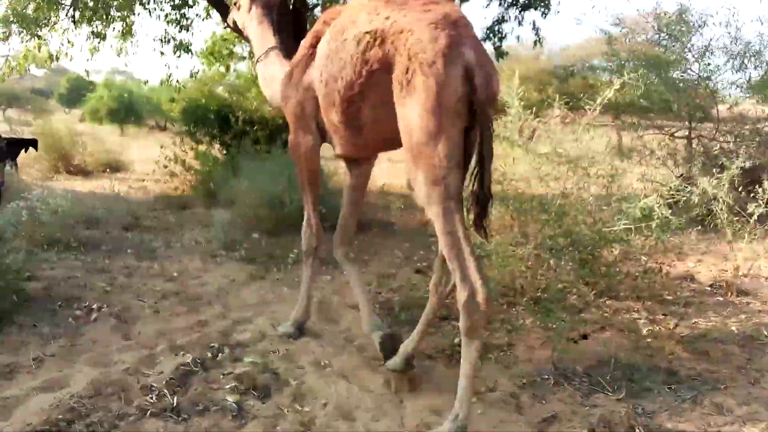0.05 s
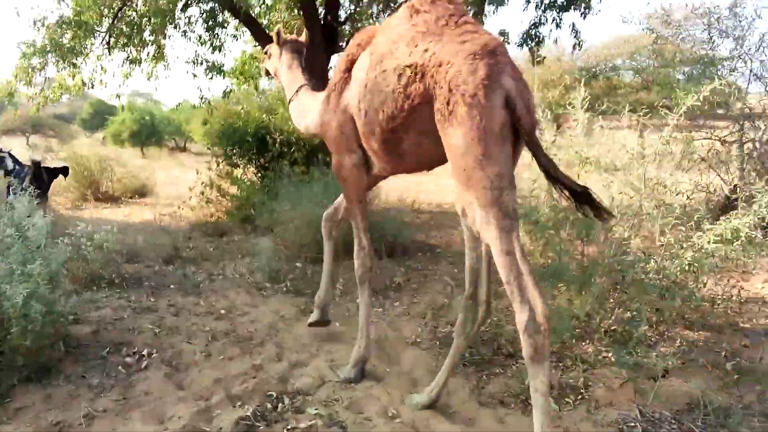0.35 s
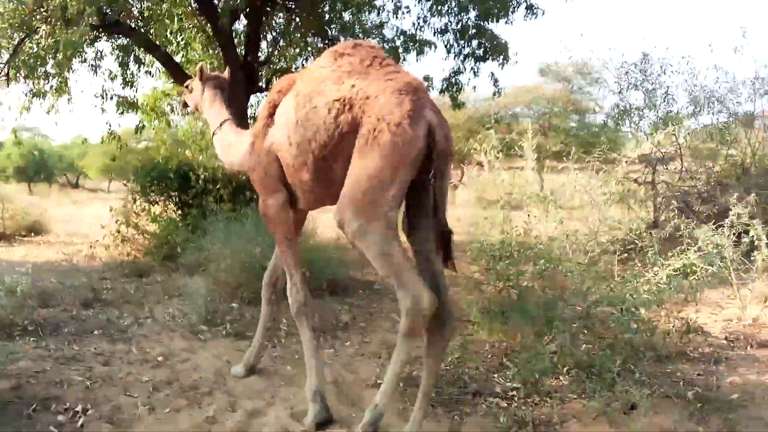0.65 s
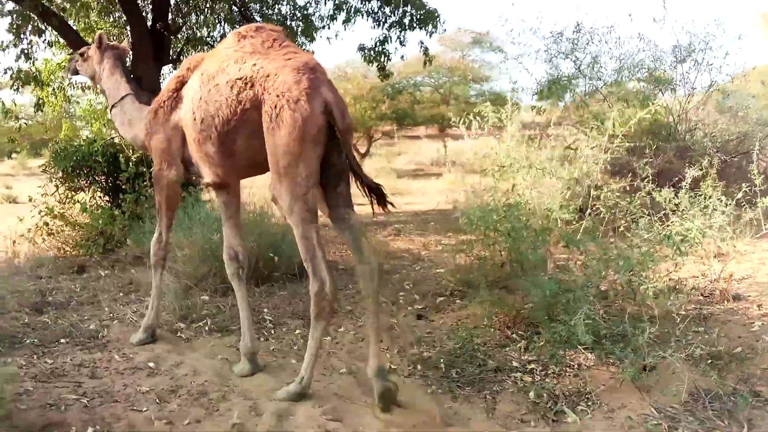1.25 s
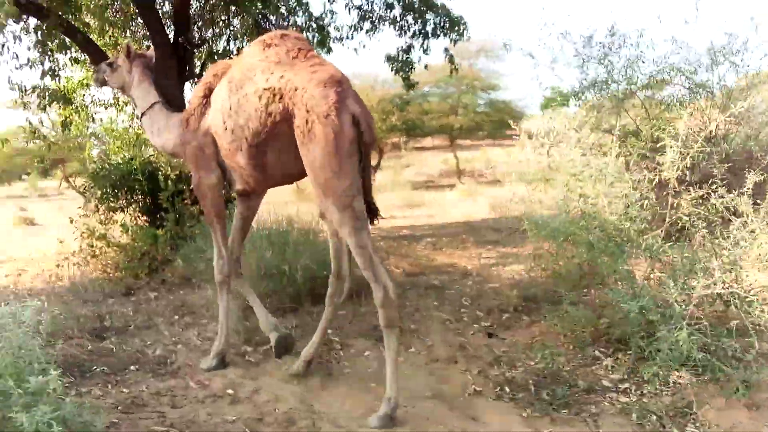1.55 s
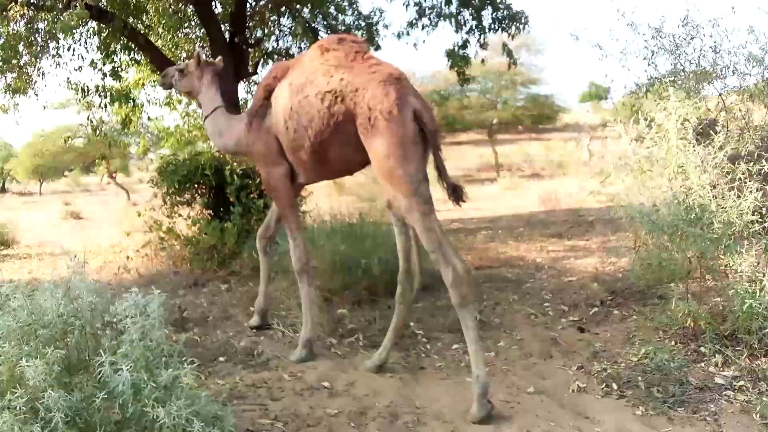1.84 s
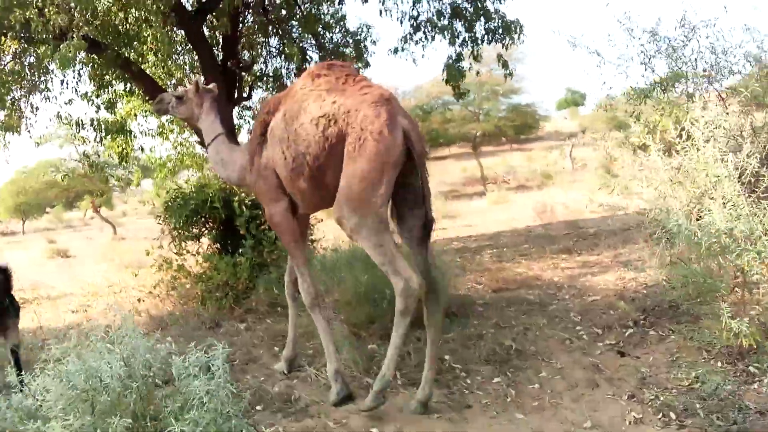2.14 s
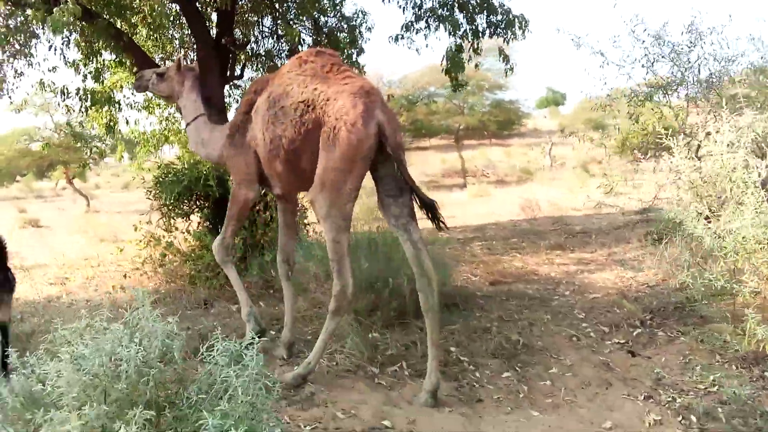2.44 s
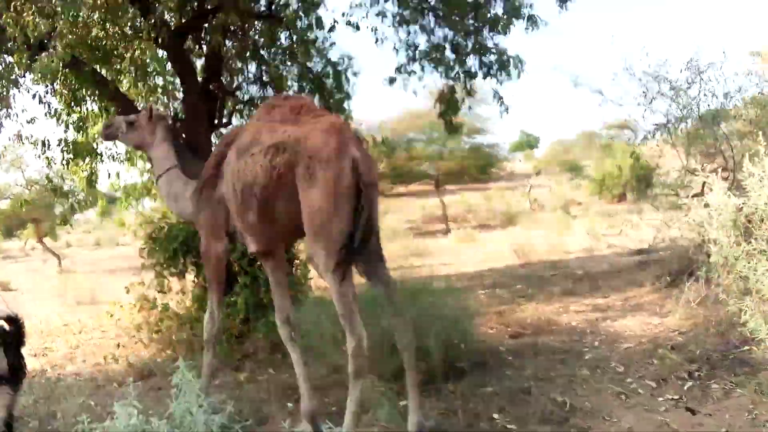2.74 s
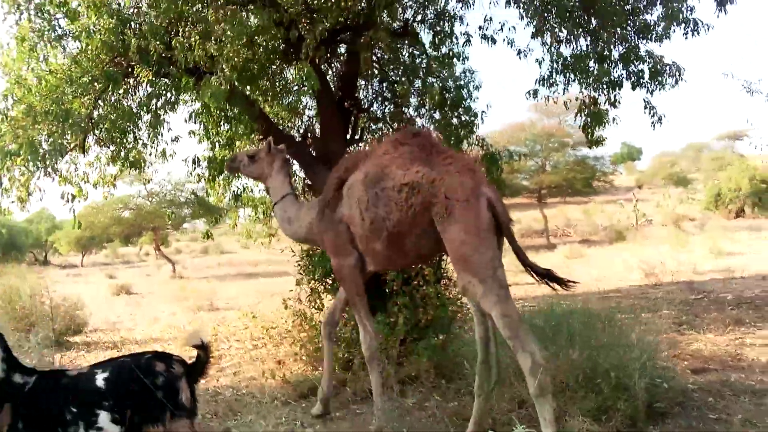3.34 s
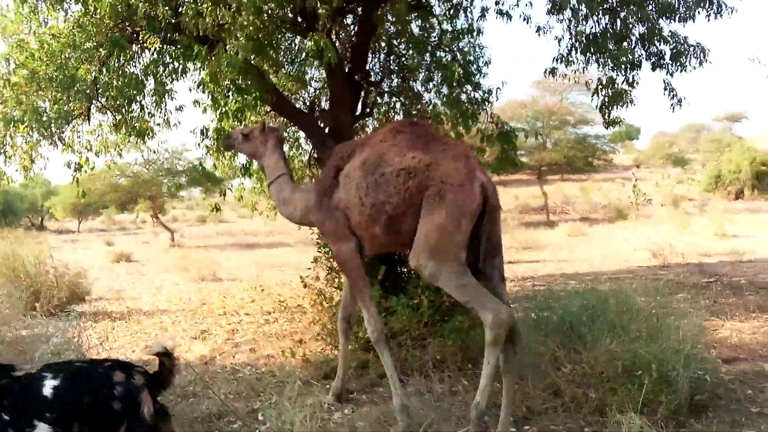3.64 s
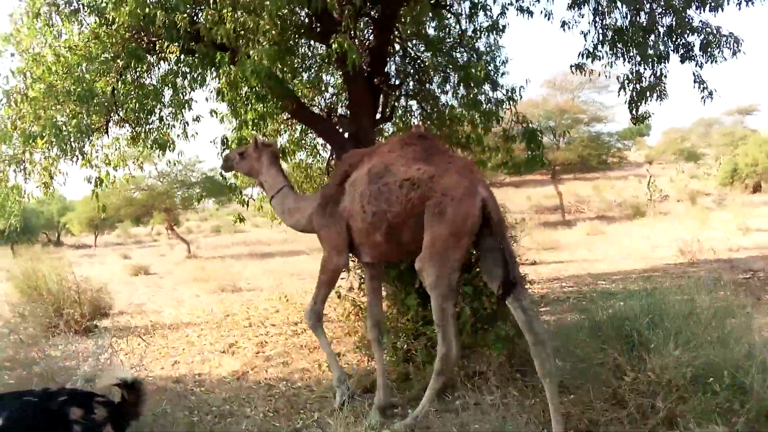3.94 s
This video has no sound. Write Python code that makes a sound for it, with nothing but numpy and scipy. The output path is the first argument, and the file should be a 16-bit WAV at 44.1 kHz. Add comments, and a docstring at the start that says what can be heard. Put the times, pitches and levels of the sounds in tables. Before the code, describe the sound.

A camel's long, rattling groan, with footsteps crunching on dry leaves and sand close by.

```python
"""Camel groaning in dry scrub

A camel gives one long, low groan: slow pulses, even at first, then ragged, ring its throat and mouth.
Close by, steps scuff through sand and dry leaves, with soft thuds, small ticks and one snapping twig.
The carried microphone rumbles under a faint outdoor hiss, and near the end something knocks it sharply."""
import sys
import numpy as np
from scipy import signal
from scipy.fft import rfft, irfft
from scipy.io import wavfile
from scipy.ndimage import uniform_filter1d

SR = 44100
rng = np.random.default_rng(int(sys.argv[2]) if len(sys.argv) > 2 else 0)


def transcribe(signal):
    """Save signal, clipped to [-1, 1], as a 16-bit WAV file at the path in sys.argv[1]."""
    frames = np.atleast_2d(signal).T
    limited = np.clip(frames, -1, 1)
    pcm = np.round(limited * 32767).astype(np.int16)
    wavfile.write(sys.argv[1], SR, pcm)


N = 176400
T = np.arange(N) / SR

# Leaf scuff and fizz through the microphone, which dips at 8 kHz and peaks at 15 kHz: freq_hz, gain_db
SCUFF_COLOUR = [(300, -31), (1100, -9), (1700, 3), (2700, 5.5), (3600, -0.5), (5200, 7), (6600, 4.5),
                (7400, -11.5), (8300, -40), (10000, -18), (13000, -2.5), (16000, -20)]
FIZZ_COLOUR = [(3000, -40), (7500, -24), (9600, -12), (11500, -13), (13300, -13.5), (13900, -9),
               (14400, -2), (15000, 0), (15700, -1), (16300, -12)]


def amp(db):
    """Decibels to gain."""
    return 10 ** (np.asarray(db) / 20)


def unit(x):
    """Scales to rms 1."""
    return x / np.sqrt(np.mean(x ** 2) + 1e-20)


def at_energy(x, db):
    """Scales a short sound to an energy (dB re full scale for one second)."""
    return amp(db) * x / np.sqrt(np.sum(x ** 2) / SR + 1e-20)


def curve(rows, column=1):
    """One column of a table, joined by lines over time."""
    rows = np.array(rows)
    return np.interp(T, rows[:, 0], rows[:, column])


def add(mix, start_s, sound):
    """Mixes a sound in at a time."""
    part = mix[max(round(start_s * SR), 0):][:len(sound)]
    part += sound[:len(part)]


def colour(x, spectrum):
    """Filters by a spectrum, causally so that clicks keep their edge."""
    hz, db = np.transpose(spectrum)
    bins_hz = abs(np.fft.fftfreq(4096, 1 / SR))
    log_gain = np.log(amp(np.interp(np.log(bins_hz + 1), np.log(hz), db)))
    taps = np.fft.ifft(np.exp(np.conj(signal.hilbert(log_gain)))).real
    return signal.fftconvolve(x, taps[:len(taps) // 2])[:len(x)]


def formants(x, modes):
    """Steep resonances of alternating sign, with dark valleys between them."""
    out = np.zeros(len(x))
    for k, (hz, width_hz, db) in enumerate(sorted(modes)):
        b, a = signal.iirpeak(hz, hz / width_hz, SR)
        out += (-1) ** k * amp(db) * signal.lfilter(b, a, signal.lfilter(b, a, x))
    return out


def burst(decay_s):
    """A puff of noise that dies away."""
    t = T[:SR // 10]
    return rng.standard_normal(len(t)) * np.exp(-t / decay_s)


def wander(hz):
    """Smooth random drift of rms 1, up to a rate."""
    lowpass = np.exp(-(np.fft.rfftfreq(N, 1 / SR) / hz) ** 4)
    return unit(irfft(rfft(rng.standard_normal(N)) * lowpass, N))


def scrub_hiss(level_db=-76.5):
    """The faint, thin hiss of open scrub."""
    # Tone of the hiss: freq_hz, gain_db
    tone = [(900, -23), (1700, 0.5), (2400, -3.5), (3400, -14), (4300, -6), (5200, 2.5), (6500, 0.5),
            (7600, -24), (12000, -20)]
    return amp(level_db) * unit(colour(rng.standard_normal(N), tone))


def handling_rumble():
    """Low noise swells and fades as the microphone is carried."""
    # Swells of the rumble: time_s, level_db
    swells = [(0, -68), (.1, -83.5), (.88, -82.5), (.98, -64.5), (1.3, -60.5), (2.5, -65), (3.1, -64),
              (3.25, -61), (3.45, -61), (3.55, -60), (3.64, -65.5), (3.75, -76), (3.81, -88), (4, -77.5)]
    # Tone of the rumble: freq_hz, gain_db
    tone = [(15, -13), (40, -11), (65, 4.5), (130, 9.5), (200, 1.5), (400, -5.5), (700, -13), (2000, -30)]
    return amp(curve(swells)) * unit(colour(rng.standard_normal(N), tone))


def crackle(tone, small_per_s=2500, big_per_s=110, spread_db=4.2, hiss_gain=.55):
    """Thousands of tiny cracks of sand and leaf, a few big ones and a bed of hiss."""
    small = amp(spread_db * np.minimum(rng.exponential(1, N), 4.5)) * rng.choice([-1, 1], N)
    small *= rng.random(N) < small_per_s / SR
    big = 2 * amp(12.5) * rng.uniform(-.73, 1, N)
    big *= rng.random(N) < big_per_s / SR
    return unit(colour(unit(small) + big + hiss_gain * rng.standard_normal(N), tone))


def scuffs(flicker_db=1.5):
    """Three layers of crackle surge under the steps, flickering into clumps."""
    # Envelopes of the scuff, the finest fizz and the low sandy grinding: time_s, level_db
    scuff = [(0, -69.5), (.07, -66.5), (.12, -84.5), (.28, -68.5), (.43, -78.5), (.46, -65), (.56, -59.5),
             (.63, -72.5), (.68, -72), (.71, -66), (.85, -85), (1.11, -84), (1.14, -109), (1.18, -59),
             (1.26, -81.5), (1.44, -66), (1.55, -75), (1.73, -78), (1.8, -56), (1.94, -63), (2.01, -66.5),
             (2.15, -75), (2.33, -69.5), (2.4, -49.5), (2.45, -61), (2.6, -66), (2.64, -58), (2.695, -44.5),
             (2.74, -53), (2.83, -60), (2.87, -51.5), (2.93, -58), (3.05, -62), (3.16, -65.5),
             (3.22, -59.5), (3.38, -69), (3.44, -49.5), (3.5, -54), (3.55, -57.5), (3.59, -66), (3.64, -67),
             (3.77, -65), (3.84, -59.5), (3.915, -47.5), (4.0, -59.5)]
    fizz = [(0, -64.5), (.1, -67.5), (.3, -66), (.43, -70.5), (.47, -52), (.6, -54.5), (.67, -64),
            (.76, -69), (.86, -80.5), (1.1, -79), (1.3, -77), (1.5, -77), (1.72, -85), (1.8, -60.5),
            (1.95, -61), (2.03, -62), (2.15, -67.5), (2.33, -80), (2.39, -48.5), (2.47, -63), (2.58, -62),
            (2.69, -44.5), (2.8, -62.5), (2.87, -57), (3.0, -61.5), (3.15, -68), (3.23, -56), (3.37, -65),
            (3.44, -50), (3.55, -58), (3.64, -67.5), (3.77, -67.5), (3.85, -56), (3.91, -51.5), (4, -59)]
    sand = [(0, -83), (.42, -80), (.55, -55.5), (.66, -67), (.85, -82.5), (3.1, -67), (3.3, -66.5),
            (3.55, -100), (3.65, -85), (3.78, -68), (3.9, -51), (4, -68.5)]
    # Tone of grinding sand: freq_hz, gain_db
    sand_colour = [(100, -53), (350, -18.5), (700, -4), (1100, -8), (1600, 8.5), (2400, 3.5), (3500, -8.5),
                   (6000, -10.5)]
    layers = [(scuff, SCUFF_COLOUR), (fizz, FIZZ_COLOUR), (sand, sand_colour)]
    flicker = amp(flicker_db * wander(hz=60.3))
    return flicker * sum(amp(curve(envelope)) * crackle(tone) for envelope, tone in layers)


def thuds(rise_s=.0063, sag_s=.047):
    """A gritty slap and a low push that sags in pitch and is quickly damped."""
    # Soft thuds: start_s, push_db, pitch_hz, slap_energy_db
    hits = [(.003, -51.5, 102, -70.5), (1.437, -40, 116, -60), (2.017, -43, 83.6, -90),
            (3.304, -57, 71, -76), (3.44, -68, 153.3, -98), (3.463, -47, 130, -76.5), (3.51, -51, 124, -91),
            (3.533, -48, 118, -79), (3.733, -55.5, 98, -111)]
    # Tone of the slap: freq_hz, gain_db
    slap_colour = [(60, -4), (300, 5.5), (750, 3), (1400, -3.5), (3200, -11.5), (5000, -15.5), (12000, -37)]
    out, t = np.zeros(N), T[:SR // 10]
    envelope = t / rise_s * np.exp(1 - t / rise_s)
    for start_s, push_db, pitch_hz, slap_db in hits:
        cycles = pitch_hz * sag_s * (1 - np.exp(-t / sag_s))
        push = amp(push_db) * envelope * np.cos(2 * np.pi * cycles)
        slap = colour(burst(decay_s=.0082), slap_colour)
        add(out, start_s, push + at_energy(slap, slap_db))
    return out


def stalk_clicks(body_db=-14.5):
    """Very short, glassy cracks of brittle stalks."""
    # Stalks clicking close by: start_s, energy_db
    clicks = [(0.16, -80), (0.488, -73), (0.618, -70), (0.6406, -73), (1.913, -72), (2.7513, -61.5),
              (2.754, -67), (2.788, -74.5)]
    out = np.zeros(N)
    for start_s, energy_db in clicks:
        crack = burst(decay_s=.0012)
        top, body = unit(colour(crack, FIZZ_COLOUR)), unit(colour(crack, SCUFF_COLOUR))
        add(out, start_s, at_energy(top + amp(body_db) * body, energy_db))
    return out


def leaf_cracks():
    """Single dry leaves crack, each with its own balance of body and fizzy top."""
    # Leaves ticking, and leaves crushed underfoot: start_s, energy_db, decay_s, top_over_body_db
    ticks = [(0.209, -85, 0.0024, 11), (0.273, -79.5, .004, 36), (0.444, -77.5, 0.0015, 5),
             (.489, -75.5, 0.0013, -1), (0.512, -84, 0.0027, -5), (0.546, -75, 0.0022, -8),
             (.577, -77.5, 0.0029, -2), (0.642, -77, 0.0052, 10), (.657, -76.5, .002, 22),
             (.779, -80.5, 0.0086, 3), (1.326, -79.5, 0.0056, -8), (1.82, -75, .002, 22),
             (1.889, -73.5, 0.0012, -2.5), (2.061, -75, 0.0046, -2), (2.391, -76, .002, 19),
             (2.459, -82, .001, 5), (2.498, -67.5, 0.0027, 5), (2.528, -75, 0.0024, 20),
             (3.233, -87, 0.0007, 5), (3.32, -65.5, 0.026, 13.5), (3.405, -74.5, .004, 8),
             (3.514, -70.5, 0.0022, -4)]
    crunches = [(1.129, -70, 0.019, -36), (2.607, -58, 0.018, -0.5), (2.619, -61.5, .007, -32),
                (3.54, -61, 0.014, -9)]
    out = np.zeros(N)
    for start_s, energy_db, decay_s, top_db in ticks + crunches:
        crack = burst(decay_s)
        top, body = unit(colour(crack, FIZZ_COLOUR)), unit(colour(crack, SCUFF_COLOUR))
        add(out, start_s, at_energy(body + amp(top_db) * top, energy_db))
    return out


def throat_hum(pitch_hz, looseness, centre_hz=241, db_per_octave=56, flutter=.32):
    """The smooth part of the groan: a few low harmonics that flutter as the throat loosens."""
    phase = 2 * np.pi * np.cumsum(pitch_hz) / SR + flutter / 3 * looseness * wander(hz=32)
    hum = np.zeros(N)
    for k in range(2, 7):
        octaves_off = abs(np.log2(k * pitch_hz / centre_hz))
        hum += amp(-db_per_octave * octaves_off) * np.cos(k * phase)
    return unit(hum * (1 + flutter * looseness * wander(hz=32)))


def groan(waver=.014, spread_db=2, puff_s=.014):
    """Slow pulses, ever more ragged and airy, ring the throat and the narrowing mouth over a hum."""
    # Rate of the throat pulses: time_s, pitch_hz
    pitch = [(.85, 78), (.93, 71), (1.0, 73), (1.05, 76), (1.08, 62.5), (1.14, 63), (1.22, 62.4),
             (1.32, 62.4), (1.42, 64.5), (1.55, 60), (1.66, 58.8), (1.88, 60), (2.14, 58), (2.22, 62),
             (2.28, 59.5), (2.41, 62), (2.49, 58), (2.6, 57.5), (2.7, 61), (2.8, 58.7), (3.04, 58.3),
             (3.12, 52)]
    # Raggedness of their timing: time_s, scatter_cycles
    raggedness = [(.85, .005), (1.15, .015), (1.3, .03), (1.55, .06), (2.0, .07), (2.3, .11), (3.1, .11)]
    # Envelope of the deep throat tone: time_s, level_db
    effort = [(.82, -114), (.87, -68.5), (.93, -64), (.98, -60.5), (1.1, -57), (1.25, -50.5), (1.5, -48.5),
              (1.9, -47), (2.13, -44), (2.45, -45), (2.85, -44.5), (3.07, -45.5), (3.11, -52.5),
              (3.15, -82)]
    # How much of the deep tone is smooth hum: time_s, power_share
    smoothness = [(.85, .98), (.93, .85), (.98, .3), (1.1, .03), (1.5, .02), (1.75, .35), (2.1, .75),
                  (2.3, .7), (3.1, .78)]
    # Envelopes of the mouth tone and the bright rasp: time_s, mouth_db, rasp_db
    mouth_levels = [(.9, -96, -91), (.98, -78, -81), (1.06, -90, -87), (1.09, -56, -65), (1.23, -54, -64.5),
                    (1.35, -56, -62), (1.56, -58.5, -59.5), (1.76, -56.5, -62), (2.0, -56.5, -67.5),
                    (2.28, -54.5, -64), (2.55, -57, -65), (2.805, -56, -66), (2.815, -51, -45.5),
                    (2.835, -55, -60.5), (3.06, -63.5, -69.5), (3.13, -85, -100)]
    # How wide the mouth gapes: time_s, wide_share
    opening = [(1.1, 1), (1.45, .9), (1.75, .55), (2.0, .05), (3.1, 0)]
    # Resonances of the throat, and of the mouth held wide or narrow: freq_hz, width_hz, gain_db
    throat = [(230.6, 72, 0.5), (301, 53, 2.5), (196, 68, 0.5), (368, 78, -6.5), (431, 96, -6.5),
              (134, 63, -17.5)]
    wide_mouth = [(625, 36.5, 6), (783, 106, -11), (901, 176, -8.5), (1279, 88, -8), (1437, 180, -12)]
    wide_rasp = [(1695, 290, -0.5), (1976, 100, 4.5), (2070, 190, -1), (2350, 360, -9.5)]
    narrow_mouth = [(601, 92, 4), (705, 260, -12.5), (815, 370, -11.5), (1144, 190, -8.5), (1300, 84, -4.5)]
    narrow_rasp = [(1670, 260, 2.5), (1857, 127, 6), (2007, 360, -3), (2323, 530, -7.5)]
    # Echoes from ground and trunk: delay_s, gain_db
    echoes = [(.0031, -15), (.0074, -8), (.0213, -12), (.038, -2)]

    pitch_hz = curve(pitch) * (1 + waver * wander(hz=14))
    scatter = curve(raggedness)
    looseness = scatter / scatter.max()
    sounding = (T > effort[0][0]) & (T < effort[-1][0])
    cycles = np.cumsum(pitch_hz) / SR
    onsets = np.flatnonzero(np.diff(np.floor(cycles)))  # one pulse a cycle
    onsets = onsets[sounding[onsets]]
    lateness, throat_accent, mouth_accent, slip = rng.standard_normal((len(onsets), 4)).T
    late_s = lateness * scatter[onsets] / pitch_hz[onsets]
    onsets = np.clip(onsets + (late_s * SR).astype(int), 0, N - 1)

    def voiced(modes, accent, breath, rattle_s=.0016):
        """The pulses, early or late as loose tissue rattles, ring resonances with puffs of breath."""
        pulses = np.zeros(N)
        rattled = onsets + (rattle_s * SR * looseness[onsets] * slip).astype(int)
        pulses[rattled] = amp(spread_db * accent * np.sqrt(looseness[onsets]))
        puffs = signal.lfilter([1], [1, -np.exp(-1 / (puff_s * SR))], pulses) * rng.standard_normal(N)
        air_share = breath * np.sqrt(looseness)
        source = np.sqrt(1 - air_share) * unit(pulses) + np.sqrt(air_share) * unit(puffs)
        ringing = formants(source, modes)
        return ringing / np.std(ringing[onsets[0]:onsets[-1]])

    hum = throat_hum(pitch_hz, looseness) * uniform_filter1d(1. * sounding, size=900)
    growl = voiced(throat, throat_accent, breath=.2, rattle_s=0)
    hum_share, gape = curve(smoothness), curve(opening)
    deep = np.sqrt(hum_share) * hum + np.sqrt(1 - hum_share) * growl
    bright = np.zeros(N)
    shapes = [(gape, wide_mouth, wide_rasp), (1 - gape, narrow_mouth, narrow_rasp)]
    for share, mouth_modes, rasp_modes in shapes:
        mouth = amp(curve(mouth_levels)) * voiced(mouth_modes, mouth_accent, breath=.6)
        rasp = amp(curve(mouth_levels, column=2)) * voiced(rasp_modes, mouth_accent, breath=.8)
        bright += np.sqrt(share) * (mouth + rasp)
    out = amp(curve(effort)) * deep + bright
    for delay_s, gain_db in echoes:
        add(out, delay_s, amp(gain_db) * bright)
    return out


def twig_snap(tail_db=-19):
    """A few fibres break in quick succession and ring the twig; the brush scatters a short tail."""
    # Fibres breaking: start_s, energy_db
    fibres = [(3.184, -57), (3.1868, -54), (3.189, -57), (3.1916, -56.5), (3.1991, -63)]
    # Resonances of the twig, plus the microphone's high ring near 15 kHz: freq_hz, width_hz, gain_db
    modes = [(2530, 210, 3), (1866, 320, -4.5), (1390, 660, -13.5), (3050, 920, -18), (4630, 2400, -18),
             (10160, 2900, -11), (14700, 1160, -1)]
    out = np.zeros(N)
    for start_s, energy_db in fibres:
        snap = at_energy(formants(burst(decay_s=.0014), modes), energy_db)
        tail = at_energy(formants(burst(decay_s=.012), modes), energy_db + tail_db)
        add(out, start_s, snap + tail)
    return out


def microphone_knocks(port_hz=15400, port_width_hz=2700, port_db=22):
    """At each knock the pressure swells, flips abruptly and relaxes, ringing the microphone's port."""
    # Knocks on the microphone: start_s, level_db, edge_s, swell_s, relax_s, polarity
    knocks = [(3.5943, -14.5, 0.000028, 0.000062, 0.00017, 1),
              (3.6058, -14.5, 0.000038, 0.00014, 0.000049, -1), (3.6096, -32, 0.00003, 0.0001, .0008, 1)]
    pressure = np.zeros(N)
    t = T[:SR // 50] - T[SR // 100]  # centred on the flip
    for start_s, level_db, edge_s, swell_s, relax_s, polarity in knocks:
        flip = np.sign(polarity) * np.tanh(t / edge_s)
        envelope = np.exp(-abs(t) / np.where(t < 0, swell_s, relax_s))
        add(pressure, start_s + t[0], amp(level_db) * flip * envelope)
    return pressure + formants(pressure, [(port_hz, port_width_hz, port_db)])


def scene():
    """The groan, the steps through the brush and the handling noises over a faint hiss, in mono."""
    camel = groan()
    steps = scuffs() + leaf_cracks() + stalk_clicks() + twig_snap() + thuds()
    handling = handling_rumble() + microphone_knocks()
    return (camel + steps + handling + scrub_hiss())[None]


def record(dry, cutoff_hz=16100):
    """The recorder's band limit."""
    taps = signal.firwin(401, cutoff_hz, window=("kaiser", 8), fs=SR)
    return signal.oaconvolve(dry, taps[None], "same")


dry = scene()
out = record(dry)
transcribe(out)
```